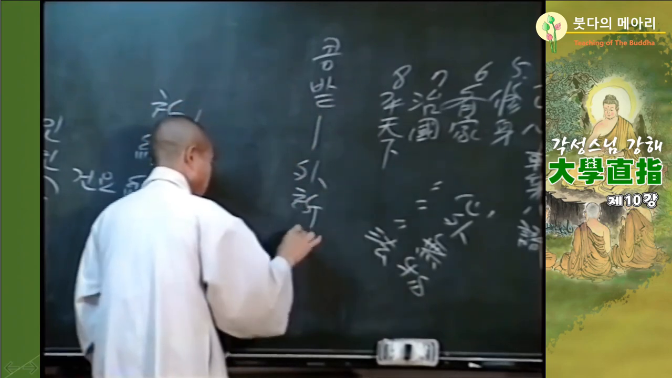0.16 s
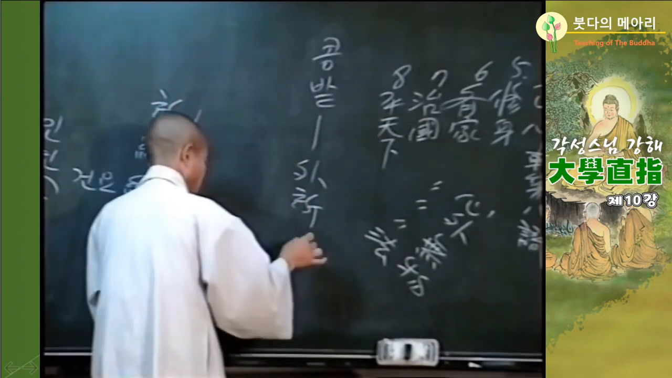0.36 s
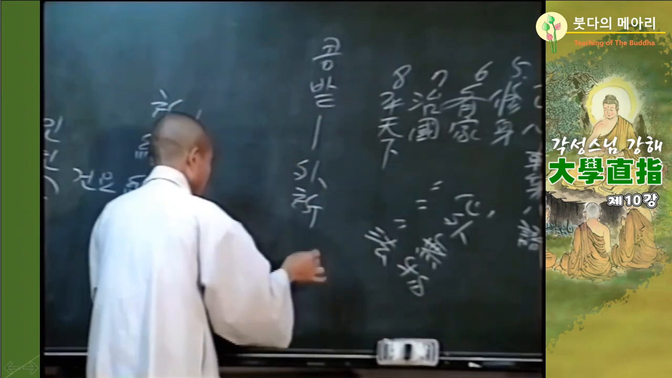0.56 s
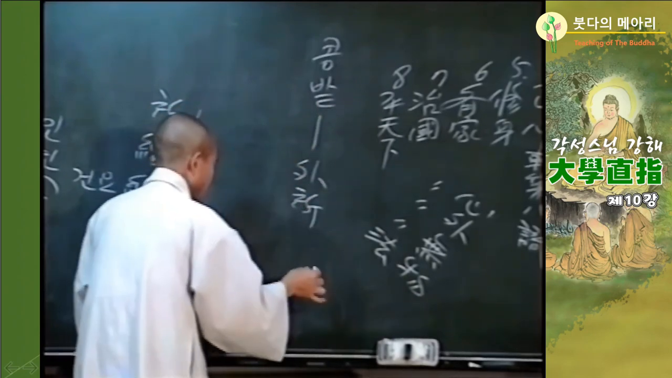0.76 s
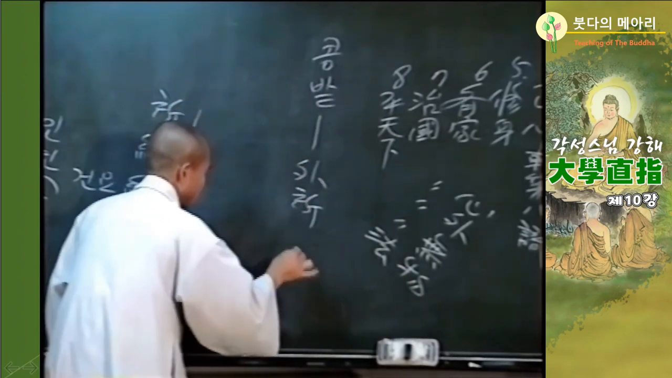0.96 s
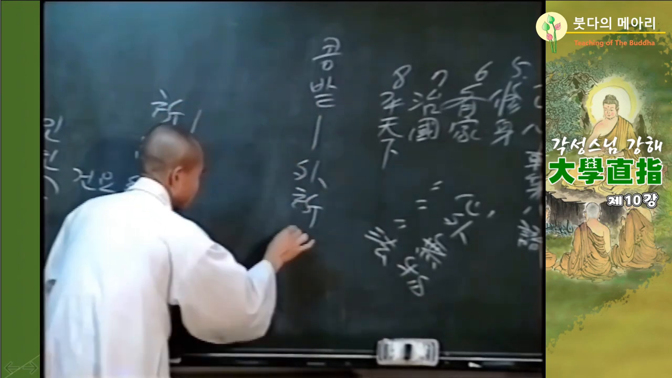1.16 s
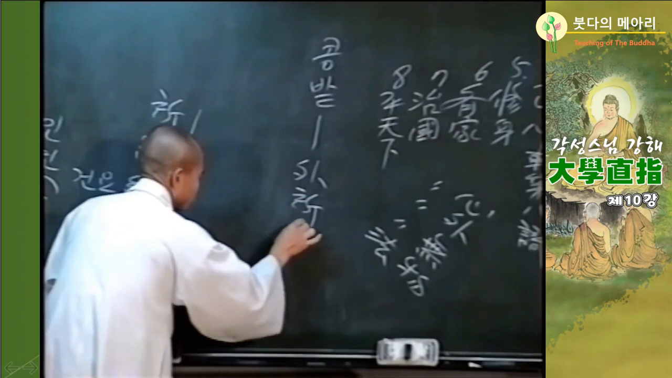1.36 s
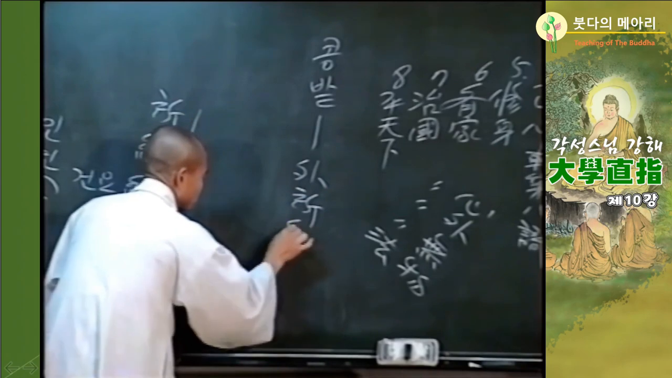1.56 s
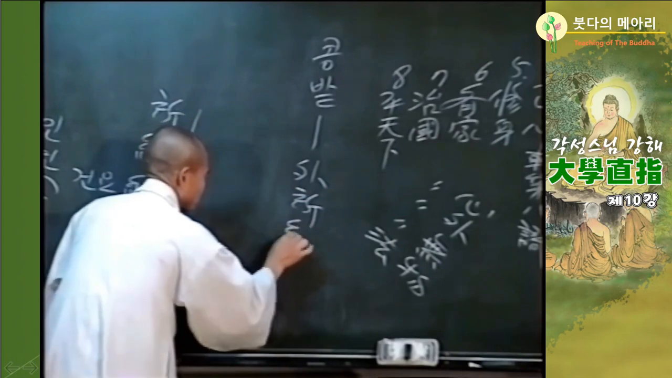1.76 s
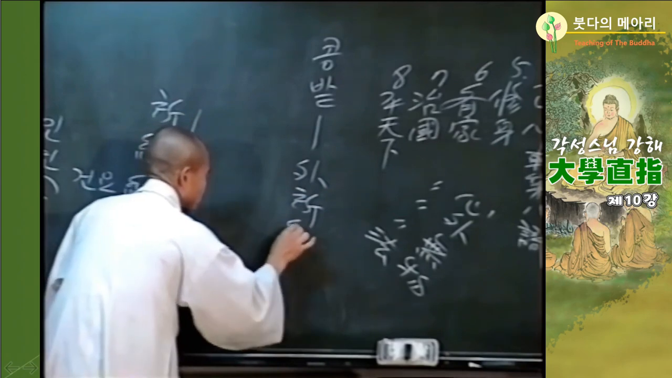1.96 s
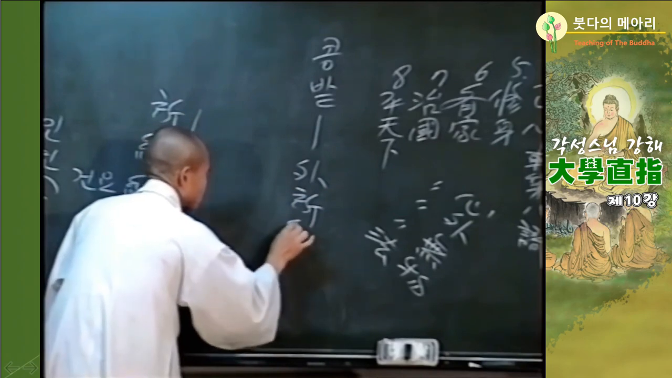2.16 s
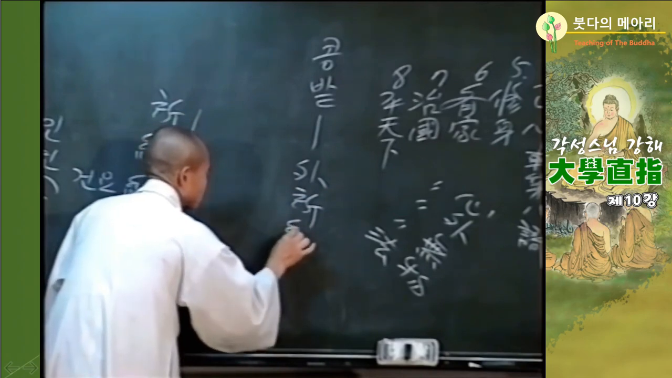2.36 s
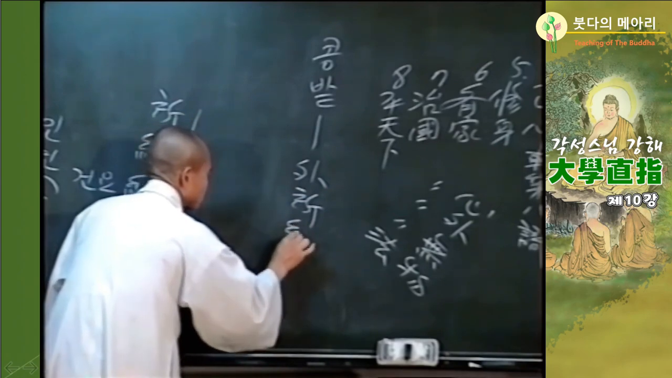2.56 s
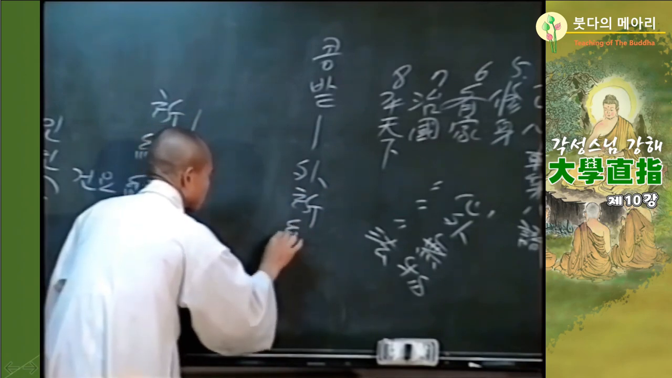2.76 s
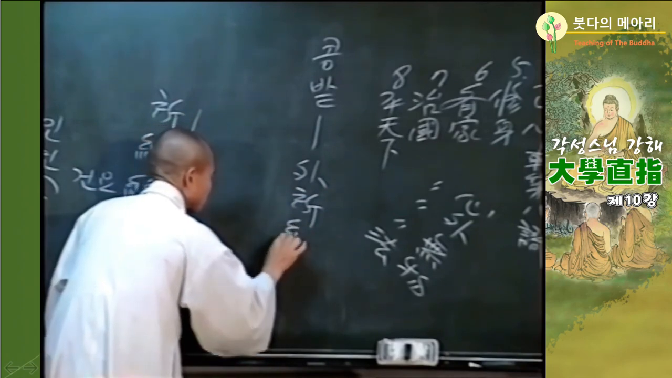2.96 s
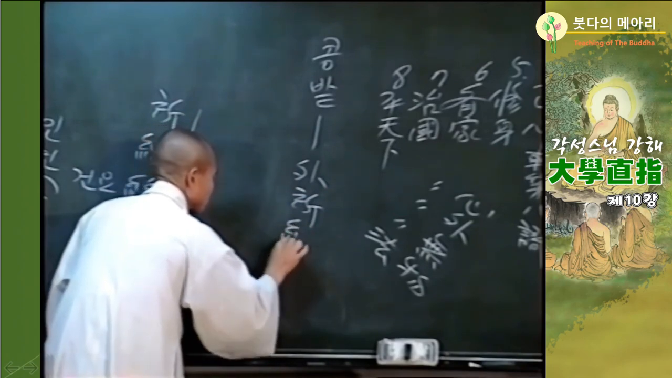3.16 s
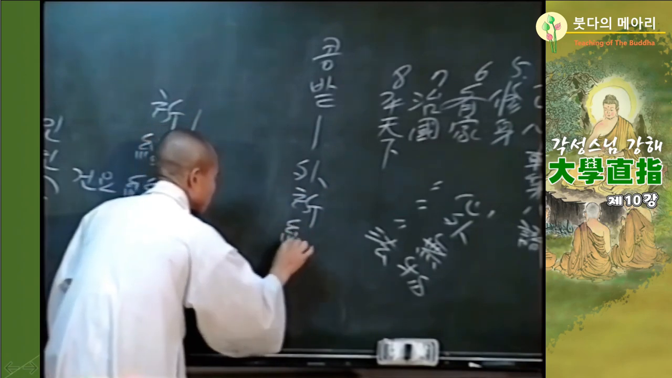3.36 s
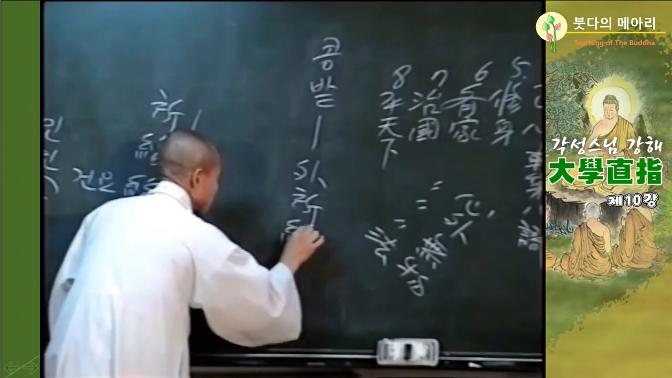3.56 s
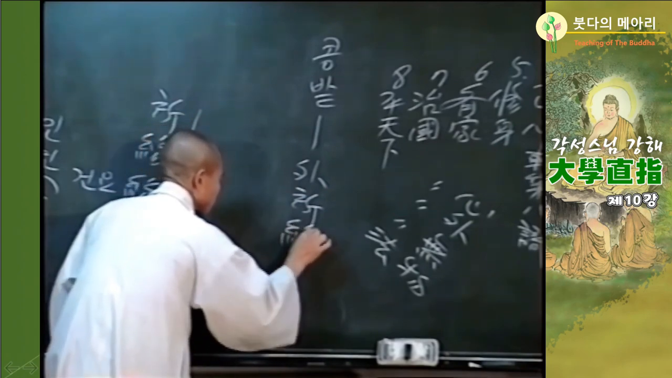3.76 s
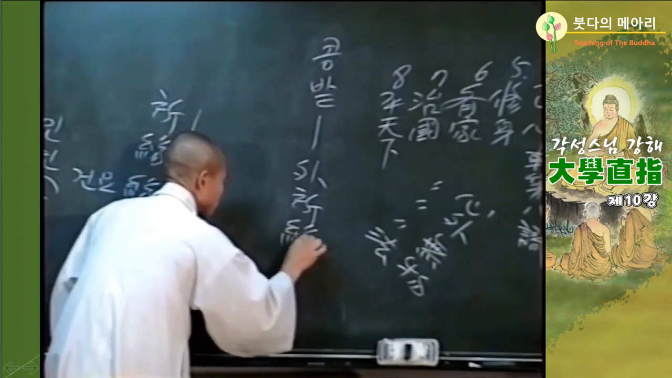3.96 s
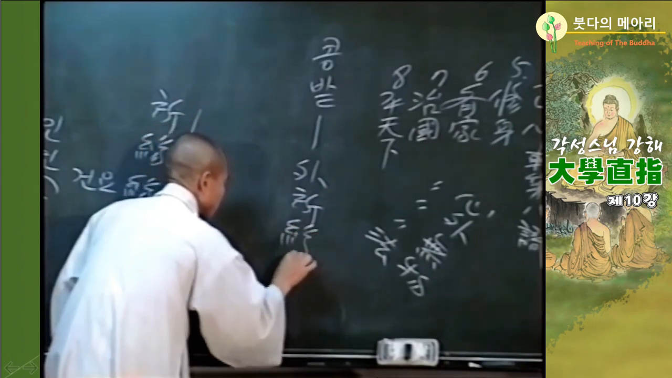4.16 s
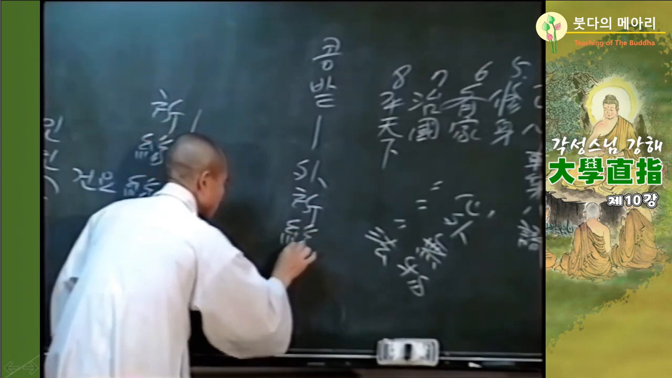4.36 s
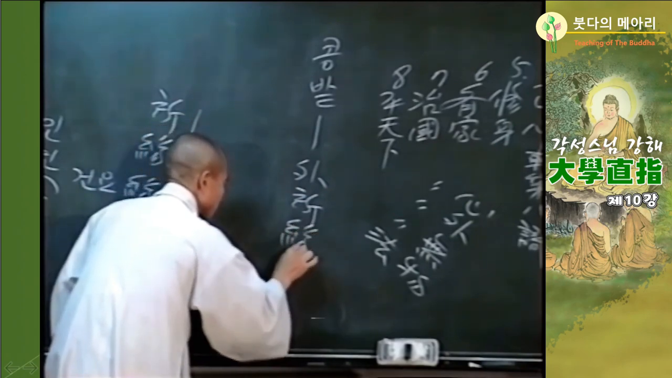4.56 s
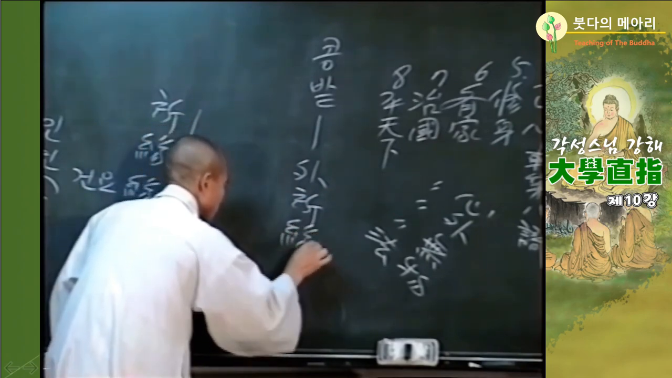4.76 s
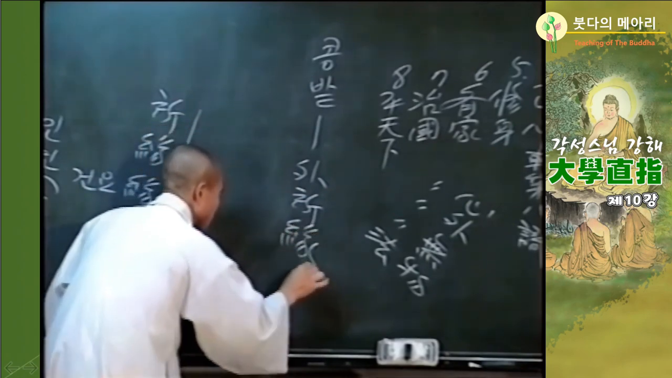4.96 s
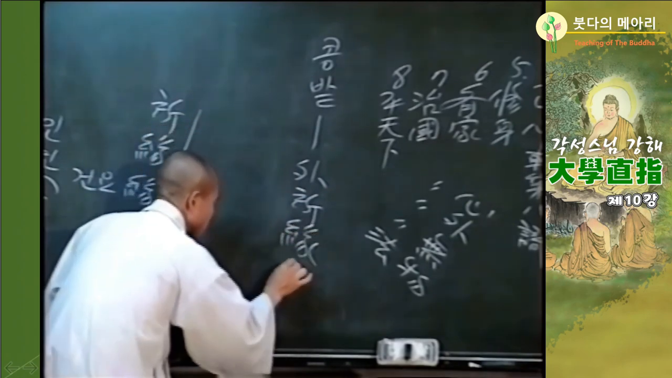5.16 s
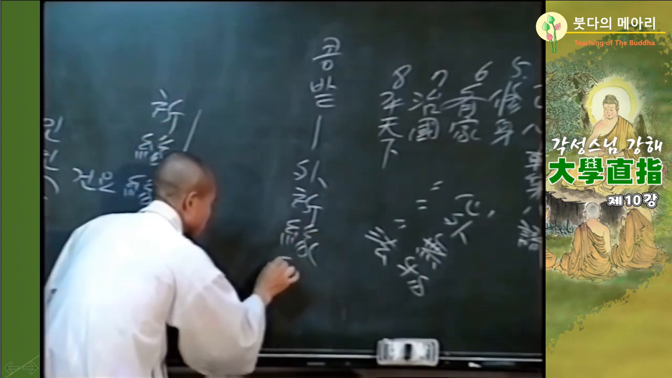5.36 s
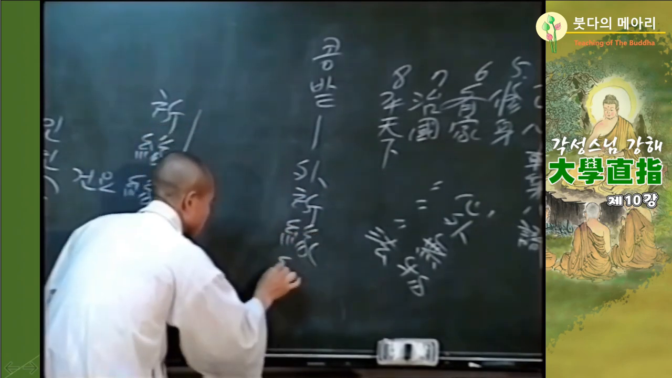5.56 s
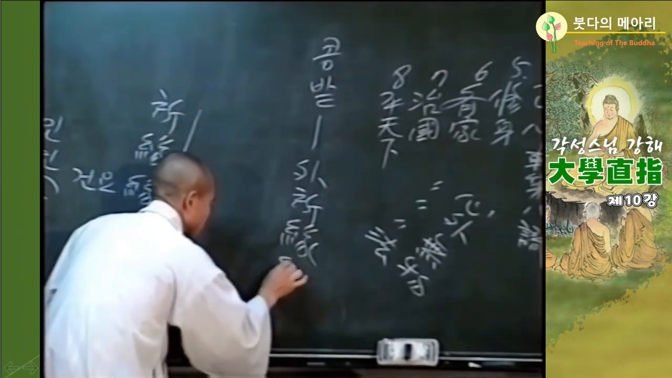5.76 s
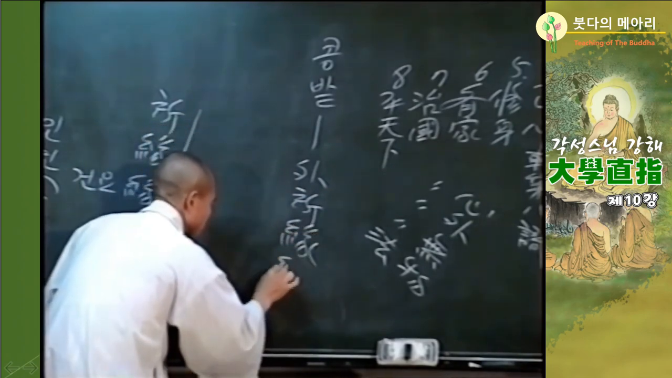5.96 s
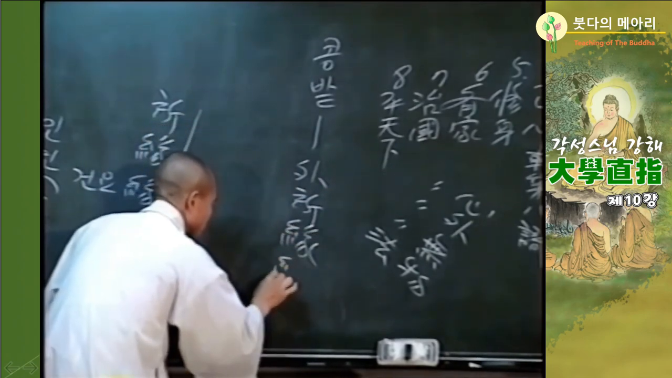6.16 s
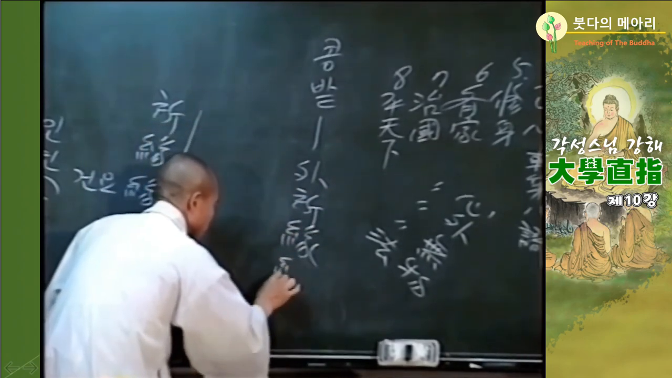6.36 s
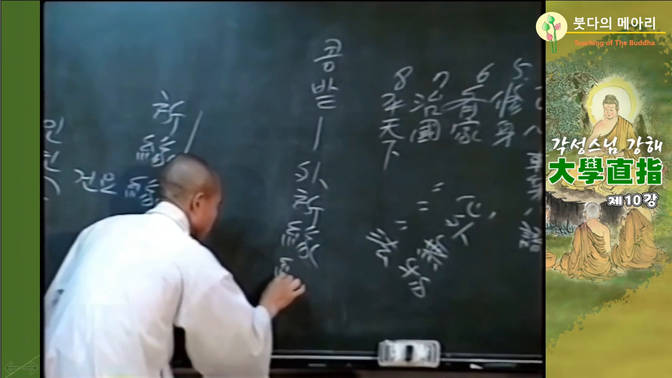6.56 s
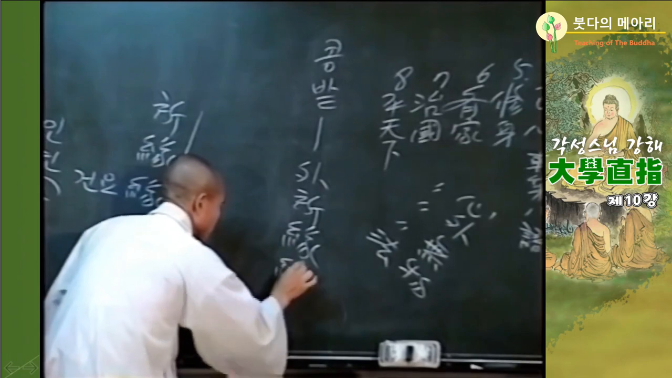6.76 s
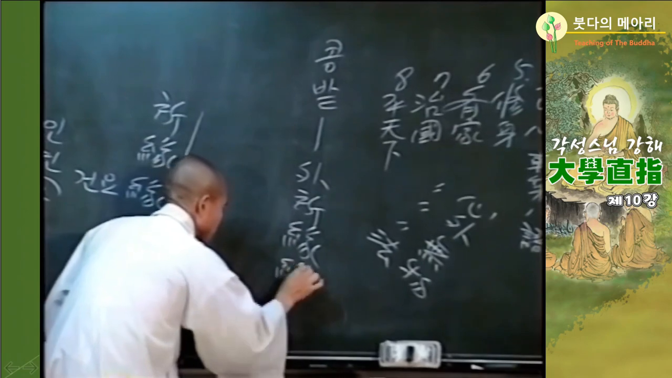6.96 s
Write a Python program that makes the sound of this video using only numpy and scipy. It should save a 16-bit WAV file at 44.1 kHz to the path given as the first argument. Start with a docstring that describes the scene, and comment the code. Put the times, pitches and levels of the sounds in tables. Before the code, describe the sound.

A still classroom with low, rumbly room tone and a very faint hum, one microphone, slightly louder on the right. At 0 s the board is still settling from an earlier stroke while faint chalk glides whisper until 0.4 s. Around 0.5 s a soft wavering low drone sounds briefly, with sleeve rustle, tiny ticks and barely audible squeaks until 1 s. At 1.15 s a fast stroke buzzes and chatters; a soft knock at 1.4 and three light scrapes follow to 1.75. After a pause, woody knocks with short gritty drags run from 2.5 to 3.7 s, about four a second, getting firmer. Light glides with faint chatter fill 3.9-4.2, then three strong taps at 4.3-4.75. A small cloth scuff at 4.95, a soft tap at 5.2, and light scratches to 5.6. Knocks resume at 5.8, moderate, ending with two hard, bright clacks at 6.7 and 6.9 and a last faint scrape.

```python
"""Chalk on a wall-hung blackboard

A quiet classroom with a faint hum, at one microphone, a little louder on the right. Many strokes land
with a knock: a noise burst, decaying board modes and slow sines for the swaying panel. The chalk then drags
and crumbles as bunched random grains; lighter strokes glide on without a knock, and fast ones chatter in
harmonics. Around them are sleeve rustles, a short scuff, ticks, faint squeaks and one soft low drone.
"""
import sys
import numpy as np
from scipy import signal
from scipy.fft import rfft, irfft
from scipy.io import wavfile
from scipy.ndimage import uniform_filter1d, map_coordinates

SR = 44100
rng = np.random.default_rng(int(sys.argv[2]) if len(sys.argv) > 2 else 0)


def store_pcm(level_fs):
    """Save levels as 16-bit WAV."""
    pcm = np.round(np.clip(level_fs, -1, 1) * 32767).astype(np.int16)
    wavfile.write(sys.argv[1], SR, np.atleast_2d(pcm).T)


N = 313110  # length in samples
TIME = np.arange(N) / SR  # the whole scene, seconds
RING = np.arange(SR) / SR  # one second for a decaying sound


def undb(db):
    """Decibels to gain."""
    return 10 ** (np.asarray(db) / 20)


def unit(x):
    """Scale to rms 1."""
    return x / np.sqrt(np.mean(x ** 2))


def fade(t60):
    """One second of exponential decay, falling 60 dB in t60 seconds."""
    return np.exp(-np.log(1000) * RING / t60)


def arch(start, length):
    """A smooth rise from 0 to 1 and back."""
    return np.sin(np.pi * np.clip((TIME - start) / length, 0, 1)) ** 2


def lookup(table, hz):
    """The columns of a table at some frequencies, joined on a log axis."""
    f, *columns = np.transpose(table)
    log_hz = np.log(np.maximum(hz, 1))
    return [np.interp(log_hz, np.log(f), column) for column in columns]


def response(spectrum, size=8192):
    """Causal, minimum-phase impulse response of unit energy with the given colour."""
    gain = undb(lookup(spectrum, np.fft.rfftfreq(size, 1 / SR))[0])
    cepstrum = irfft(np.log(gain))
    # fold the cepstrum onto positive times
    cepstrum[1:size // 2] *= 2
    cepstrum[size // 2 + 1:] = 0
    h = irfft(np.exp(rfft(cepstrum)))
    return h / np.linalg.norm(h)


def colour(x, spectrum):
    """Filter by a spectrum; white noise keeps its level."""
    return signal.fftconvolve(x, response(spectrum))[:len(x)]


def band(x, lo_hz, hi_hz):
    """Band-pass."""
    edges = [lo_hz, min(hi_hz, SR / 2 - 1)]
    return signal.sosfilt(signal.butter(2, edges, "band", fs=SR, output="sos"), x)


def resonance(x, hz, width_hz):
    """One broad resonance; the fingers keep it damped, at least 480 Hz wide."""
    return signal.lfilter(*signal.iirpeak(hz, hz / max(width_hz, 480), fs=SR), x)


def add(track, s, sound):
    """Mix a sound into a track at a time in seconds."""
    i = max(int(s * SR), 0)
    track[i:i + len(sound)] += sound[:max(N - i, 0)]


# Colour of the still room. Each row: frequency in Hz, relative level in dB per Hz.
ROOM_COLOUR = [(20, 2), (45, 2), (100, -9), (220, -14.5), (450, -22.5), (1000, -26), (2000, -36.5),
               (4000, -43), (8000, -50.5), (11000, -51), (13500, -65)]


def room_air(level_db=-54.5):
    """The still room at the microphone: steady coloured noise."""
    return undb(level_db) * colour(rng.standard_normal(N), ROOM_COLOUR)


# Faint mains hum in the room. Each row: frequency in Hz, rms level in dB.
HUM_TONES = [(179, -74.5), (360, -80), (539, -78)]


def hum():
    """Steady sine tones."""
    return sum(undb(db) * unit(np.sin(2 * np.pi * hz * TIME)) for hz, db in HUM_TONES)


# Slow sway of the whole panel on the wall.
# Each row: frequency in Hz, relative level in dB, basic time to fall 60 dB in seconds.
PANEL_SWAY = [(24.44, -24, 0.72), (43.53, -26.5, 0.99), (66.2, -45, 1)]
# The ring left in the board. Each row: frequency in Hz, relative level in dB per Hz.
SETTLING_COLOUR = [(30, -3), (300, -2.5), (1200, -10.0), (3500, -30), (12000, -41)]


def settling(ring_db=-47, t60=0.39, sway_db=-8):
    """At the start the board still rings from an earlier stroke: fading noise over decaying sway sines."""
    out = np.zeros(N)
    ring = colour(rng.standard_normal(SR), SETTLING_COLOUR) * fade(t60)
    sway = sum(undb(db) * np.sin(2 * np.pi * hz * RING) * fade(1.3 * decay) for hz, db, decay in PANEL_SWAY)
    add(out, 0, undb(ring_db) * ring)
    add(out, 0, undb(sway_db) * sway)
    return out


def crumble(grain_rate=9000, judder_db=-1.0, judder_hz=110):
    """Dense random grains in uneven bunches, like a chalk tip fracturing as it sticks and slips."""
    grains = (rng.random(N) < grain_rate / SR) * rng.standard_normal(N)
    judder = unit(band(rng.standard_normal(N), 15.0, judder_hz))
    return unit(grains * undb(judder_db * judder))


# Light strokes that glide along the board without a knock.
# Each row: start in seconds, length in seconds, drag level in dB.
GLIDES = [(.073, 0.098, -64), (0.17, 0.083, -58), (0.309, 0.069, -70), (1.172, 0.16, -59),
          (1.513, 0.074, -56), (1.615, 0.075, -54.5), (1.703, 0.059, -54.5), (3.864, 0.051, -56.5),
          (3.926, .098, -60), (4.004, 0.079, -53.5), (4.091, 0.097, -57.5), (5.365, 0.054, -58),
          (5.448, .1, -65), (5.559, 0.044, -58.5), (7.058, .061, -58)]
# How a firm drag after a knock works on board and chalk.
# In order: push on the board in dB, ring of the stick in dB, against the drag level and the grit.
FIRM_GRIP = (5.1, -7.5)
# The same two values in the same order for a light glide.
LIGHT_GRIP = (3.6, -8.5)
BITE_S = 0.014  # from the landing until the chalk slides


def strokes():
    """Every drag as (start s, length s, dB, grip): firm after a knock, light in a glide."""
    firm = [(s + BITE_S, length, db, FIRM_GRIP) for s, _, _, _, length, db in TAPS]
    light = [(s, length, db, LIGHT_GRIP) for s, length, db in GLIDES]
    return firm + light


# Swishes of a wide sleeve, and one short faint scuff at 4.944 s.
# Each row: start in seconds, length in seconds, level in dB.
SWISHES_AND_SCUFF = [(-.35, 1, -55.5), (0.468, 0.49, -56.5), (1.057, 0.57, -67), (3.25, .55, -60),
                     (4.944, 0.084, -51)]


def brushing_strength(stir_db=-1.5, spread_s=0.78):
    """Level of the brushing: sleeve swishes, one short scuff, and a slow stir averaged from the drags."""
    writing = sum(undb(db) * (TIME > s) * (TIME < s + length) for s, length, db, _ in strokes())
    stir = undb(stir_db) * uniform_filter1d(writing, size=int(spread_s * SR))
    return stir + sum(undb(db) * arch(s, length) for s, length, db in SWISHES_AND_SCUFF)


# Colour of the cloth. Each row: frequency in Hz, relative level in dB per Hz.
CLOTH_COLOUR = [(60, 10), (250, 3.5), (600, -10.5), (2000, -16), (5000, -18.5), (8000, -26.5), (14000, -45)]


def sleeve_and_scuff():
    """Uneven brushing of cloth, and the scuff in the same colour: bunched grains, filtered."""
    brushing = colour(crumble(grain_rate=12000, judder_db=1.0, judder_hz=40.1), CLOTH_COLOUR)
    return brushing * brushing_strength()


# Resonances of the chalk stick in the hand.
# Each row: frequency in Hz, width in Hz (widened to 480 where narrower), relative level in dB.
STICK_RESONANCES = [(3350, 400, -4.5), (5260, 450, 1), (6370, 400, -8), (7190, 890, 7.5), (8720, 500, 5.5),
                    (9960, 450, -14.5), (10800, 550, -2.5)]
# Hiss of crumbling chalk at the tip. Each row: frequency in Hz, relative level in dB per Hz.
GRIT_COLOUR = [(500, -13.5), (2000, -5), (3500, 1.5), (5200, 5.5), (7200, -4.5), (9000, -6.5), (12000, -9),
               (14000, -25.5)]
# The board's answer to the crumbling. Each row: frequency in Hz, relative level in dB per Hz.
RUB_COLOUR = [(60, -4.5), (170, 19.5), (320, 11), (700, 8), (1200, 8), (2000, 2), (3400, 0.5),
              (6000, -15.5)]


def ringing_stick(bend):
    """Grains excite the stick's resonances, which bend as the fingers tilt it."""
    stick = unit(sum(undb(db) * unit(resonance(crumble(), hz, width)) for hz, width, db in STICK_RESONANCES))
    # an uneven reading speed bends all resonances together
    drift = 1 + bend * unit(band(rng.standard_normal(N), 1.0, 6.6))
    return map_coordinates(stick, [np.cumsum(drift)], mode="wrap")


def drags(grit_db=0, rub_db=1, rise=0.43, fall=0.23, sway_db=4, bend=.025, chatter_stick_db=-4.5):
    """The chalk speeds up and lifts off in each stroke; its grit hisses, rings the stick, shakes the board."""
    grit = crumble()
    stick = ringing_stick(bend)
    dust = colour(grit, GRIT_COLOUR)
    scrape, force = np.zeros(N), np.zeros(N)
    for start, length, db, (board_db, stick_db) in strokes():
        along = (TIME - start) / length  # 0 at the start of the stroke, 1 at its end
        speed = np.clip(along / rise + .5, 0, 1) * np.clip((1 - along) / fall + .5, 0, 1)
        speed *= 1 - 0.52 * np.clip(2 * along - 1, -1, 1) ** 2
        hiss = dust + undb(stick_db) * stick
        # reflections off the hand and the board comb each stroke differently
        lags = rng.integers(20, 90, 2)  # samples
        echoes = .27 * sum(np.roll(hiss, lag) for lag in lags)
        scrape += undb(db) * speed * (hiss + echoes)
        force += undb(db + board_db) * speed
    # chatter rings the stick hard
    scrape += stick * sum(undb(db + chatter_stick_db) * arch(s, length) for s, length, _, db in CHATTER)
    rub = colour(grit * force, RUB_COLOUR)
    rumble = unit(band(rng.standard_normal(N), 16, 65.6)) * uniform_filter1d(force, size=4000)
    return undb(grit_db) * scrape + undb(rub_db) * rub + undb(sway_db) * rumble


DRONE_S, DRONE_HZ, DRONE_DB = .475, 229, -51.5  # start, lower pitch, level before the fall
DRONE_ATTACK_S, DRONE_HOLD_S, DRONE_FALL_DB_PER_S = 0.014, 0.14, 122  # hold counts from the start
# The drone's second tone. In order: frequency ratio to the first, level in dB against the first.
DRONE_SECOND_TONE = (1.35, -4.5)


def drone(waver=0.085, flutter_db=2.5):
    """While the hand is off the board, two soft low tones waver in pitch and level, hold briefly and fade."""
    out = 0
    for ratio, db in [(1, 0), DRONE_SECOND_TONE]:
        pitch, strength = (unit(band(rng.standard_normal(N), 9.1, 56)) for _ in range(2))
        phase = 2 * np.pi * np.cumsum(ratio * DRONE_HZ * (1 + waver * pitch)) / SR
        out = out + undb(db + flutter_db * strength) * np.sin(phase)
    age = TIME - DRONE_S
    attack = np.clip(age / DRONE_ATTACK_S, 0, 1)
    fall_db = DRONE_FALL_DB_PER_S * np.maximum(age - DRONE_HOLD_S, 0)
    return unit(out) * attack * undb(DRONE_DB - fall_db)


# Faint ticks, some as the chalk lifts off the board.
# Each row: start in seconds, level in dB before a common lift, pitch of the noise band in Hz.
TICKS = [(.484, -56, 700), (.838, -57, 2240), (.991, -59, 1450), (1.753, -47, 920), (1.862, -64.5, 3500),
         (4.175, -42.5, 860), (5.598, -51, 990)]


def ticks(t60=0.021, lift_db=6):
    """Small, short, light contacts: band-passed noise that dies at once."""
    out = np.zeros(N)
    for s, db, hz in TICKS:
        noise = unit(band(rng.standard_normal(SR), hz / 2, hz * 1.24))
        add(out, s, undb(db + lift_db) * noise * fade(t60))
    return out


# Faint squeaky rustles while the arm reaches down.
# Each row: start in seconds, length in seconds, pitch in Hz, level in dB.
SQUEAKS = [(0.586, 0.12, 2940, -71), (.74, 0.13, 1590, -70), (.75, .1, 2200, -71)]


def squeaks(width_hz=170):
    """Light friction: noise in a narrow band that swells and dies away."""
    out = np.zeros(N)
    for s, length, hz, db in SQUEAKS:
        friction = unit(band(rng.standard_normal(N), hz - width_hz / 2, hz + width_hz / 2))
        out += undb(db) * arch(s, length) * friction
    return out


# Fast strokes that chatter across the board.
# Each row: start in seconds, length in seconds, top slip rate in Hz, level in dB.
CHATTER = [(1.149, .165, 337.7, -48), (3.962, 0.2, 208, -58.5)]


def chatter(overtone_db=-11, slope_db=-3, slip_sag=0.26):
    """In fast drags the tip slips almost regularly: a buzz of harmonics whose rate follows its speed."""
    out = 0
    for s, length, top_hz, db in CHATTER:
        speed = arch(s, length)
        jitter = .012 * unit(band(rng.standard_normal(N), 10, 120))
        # slips come slower at the slow ends of a stroke
        slip_hz = top_hz * (1 - slip_sag * (1 - speed)) * (1 + jitter)
        phase = 2 * np.pi * np.cumsum(slip_hz) / SR
        overtones = sum(undb(overtone_db + slope_db * k) * np.sin((k + 2) * phase) for k in range(5))
        out = out + unit(np.sin(phase) + overtones) * undb(db) * np.sqrt(speed)
    return out


# How the hardness of a contact sets its highs; a hard contact is short, so it reaches high.
# Each row: hardness from 0 to 1, clack in dB, tip click in dB.
HARDNESS = [(0, -29, -4), (.5, 1.5, -5.5), (1, 1.5, 5.5)]


def contact(db, weight_db, hardness):
    """Colour of one landing (Hz, dB): the arm's weight sets the lows, the hardness of the contact the highs."""
    steps, *highs = np.transpose(HARDNESS)
    clack_db, click_db = (np.interp(hardness, steps, column) for column in highs)
    wood_db = 0.1 - 0.15 * (db + 30)  # knocks stronger than -30 dB are less woody
    low_ring_db = 2 + weight_db
    return [(300, low_ring_db), (700, 0), (1450, wood_db), (3200, clack_db), (7000, click_db)]


# The board's dense modes.
# Each row: frequency in Hz, level in dB per Hz, time to fall 60 dB in seconds, share of room tail in dB.
BOARD_RING = [(70.3, -8, 0.99, -1), (157, -5, 0.14, -13.5), (300, -4.5, 0.48, -10), (690, 0.5, 0.18, -5.5),
              (1140, 1, 0.047, -19.5), (1580, -1, 0.083, -15.5), (3560, -12.5, 0.038, -22.5),
              (4350, -27, 0.095, -17.5), (6700, -22, 0.032, -24.5), (9400, -34.5, 0.036, -27.5),
              (14000, -49.5, .03, -26)]


def dense_ring(tilt, vary_db=1.5, room_t60=0.51, early=0.027):
    """Countless board modes as third-octave noise: each band's own decay, then the room's tail."""
    out, total = 0, 0
    count = int(early * SR)  # each band is levelled over its first samples
    for hz in 80 * 2 ** (np.arange(23) / 3):
        db, t60, tail_db = lookup(BOARD_RING, hz)
        # the first second lets the filter settle
        noise = band(rng.standard_normal(2 * SR), hz / 2 ** (1 / 6), hz * 2 ** (1 / 6))[SR:]
        ring = noise * np.hypot(fade(t60), undb(tail_db) * fade(room_t60))
        ring *= 1 - np.exp(-(2 * hz * RING) ** 2)  # each band needs about a cycle to build up
        weight = undb(db) * np.sqrt(hz)
        # each knock draws its band levels slightly differently at random
        tilt_db = lookup(tilt, hz)[0] + vary_db * rng.standard_normal()
        out = out + ring / np.std(ring[:count]) * weight * undb(tilt_db)
        total += weight ** 2
    return out / np.sqrt(total)


# Clear modes of the board.
# Each row: frequency in Hz, relative level in dB, time to fall 60 dB in seconds.
CLEAR_MODES = [(122.7, -10.5, 0.36), (178, -8.5, 0.41), (266.5, -8, 0.39), (298.6, -6, 0.34),
               (375.3, -4, 0.22), (423, -2, 0.11), (613, -4.5, 0.16), (690, 2, 0.15), (911, 0, 0.065),
               (1123, 0, 0.12), (1464, -2.5, 0.092), (1763, -3.5, 0.11), (2326, -0.5, 0.04),
               (2380, -14.5, 0.1), (3424, -3, 0.031)]


def clear_modes(tilt, vary_db):
    """Decaying sines, with level, sign and slight detuning drawn at random for each landing."""
    out = 0
    chance = rng.standard_normal((len(CLEAR_MODES), 3))
    for (hz, mode_db, t60), (size, side, detune) in zip(CLEAR_MODES, chance):
        gain = undb(mode_db + lookup(tilt, hz)[0] + vary_db * size) * np.sign(side)
        out = out + gain * np.sin(2 * np.pi * hz * (1 + 0.013 * detune) * RING) * fade(t60)
    return out


def crush(size=2048, t60=0.02):
    """The tip crushes in a burst of a few milliseconds, even in broad colour and of unit energy."""
    spectrum = rfft((rng.standard_normal(SR) * fade(t60))[:size])
    broad_power = uniform_filter1d(np.abs(spectrum) ** 2, size=25)
    burst = irfft(spectrum / np.sqrt(broad_power))[:size // 2]
    return burst / np.linalg.norm(burst)


# First crack of the contact. Each row: frequency in Hz, relative level in dB.
CRACK_COLOUR = [(100, -11), (400, 0.5), (800, 11), (1700, -13.5), (3300, -15), (4600, -18.5), (6400, -20.5),
                (9000, -45), (14000, -36)]
# Strokes that land on the board with a knock, then drag.
# Each row: landing in seconds, knock level in dB, arm weight in dB, contact hardness from 0 to 1,
# drag length in seconds, drag level in dB.
TAPS = [(1.3823, -37.5, -4.5, .2, 0.099, -55), (2.5006, -36, .5, .03, 0.11, -61),
        (2.7435, -29, -1, .42, 0.1, -57.5), (2.9929, -32.5, 1, 0.25, 0.098, -59),
        (3.223, -26.5, -.5, 0.43, 0.077, -56.5), (3.4974, -26, -0.5, 0.37, .09, -56),
        (3.724, -25, .5, 0.49, 0.11, -52.5), (4.281, -27.5, 0, 0.68, 0.1, -54),
        (4.5071, -25.5, 1.5, 0.98, 0.068, -52.5), (4.7314, -24.5, 3.5, 0.6, 0.14, -52),
        (5.2176, -36, .5, 0.42, 0.092, -55.5), (5.8118, -32, -1, .4, 0.075, -57),
        (6.0018, -38.5, 0, 0.85, .12, -60), (6.247, -30.5, 0, 0.69, 0.094, -57.5),
        (6.4607, -30, -1, 0.6, 0.083, -59.5), (6.7156, -22.5, -2.5, 1, 0.086, -53),
        (6.9227, -24.5, -0.5, 1, .102, -52)]


def taps(dense_db=0.0, modes_db=-2, crack_db=27.0, vary_db=1.0, sway_db=25):
    """Each landing: a crack, the board's ring, and the slow sway of the panel."""
    out = np.zeros(N)
    sway = -sum(undb(db) * np.sin(2 * np.pi * hz * RING) * fade(t60) for hz, db, t60 in PANEL_SWAY)
    sway = sway * (1 - np.exp(-RING / 0.01))  # soft onset
    for s, db, weight_db, hardness, _, _ in TAPS:
        tilt = contact(db, weight_db, hardness)
        modes = clear_modes(tilt, vary_db)
        crack_colour = [(hz, level + lookup(tilt, hz)[0]) for hz, level in CRACK_COLOUR]
        crack = np.convolve(crush(), response(crack_colour))
        add(out, s, undb(db) * (undb(dense_db) * dense_ring(tilt) + undb(modes_db) * modes))
        add(out, s, undb(db + crack_db) * crack)
        # the arm's weight sways the panel more than it rings it
        add(out, s, undb(db + 2 * weight_db + sway_db) * sway)
    return out


# Colour of the walls' tail. Each row: frequency in Hz, relative level in dB per Hz.
WALL_COLOUR = [(100, 1.5), (3000, -5.0), (7000, -16), (14000, -10.0)]


def classroom(x, wet_db=-11, t60=0.32):
    """The walls add a short, duller tail to the small sounds: decaying noise from 6 ms on."""
    tail = colour(rng.standard_normal(SR), WALL_COLOUR) * fade(t60) * (RING > .006)
    return x + undb(wet_db) * signal.fftconvolve(x, tail / np.linalg.norm(tail))[:N]


def scene(right_db=2.5):
    """Everything reaches one microphone, louder on the right; each channel also gets very faint own noise."""
    small_sounds = classroom(drags() + ticks() + squeaks())
    background = room_air() + hum() + sleeve_and_scuff()
    mono = taps() + small_sounds + chatter() + drone() + settling() + background
    channels = undb(np.array([[-right_db], [right_db]]) / 2)
    faint_noise = undb(-90) * rng.standard_normal((2, N))  # independent in the two channels
    return mono * channels + faint_noise


def record(dry, top_hz=13500):
    """The recorder cuts the top steeply with an elliptic low-pass."""
    return signal.sosfilt(signal.ellip(8, .2, 70, top_hz, fs=SR, output="sos"), dry)


dry = scene()
out = record(dry)
store_pcm(out)
```